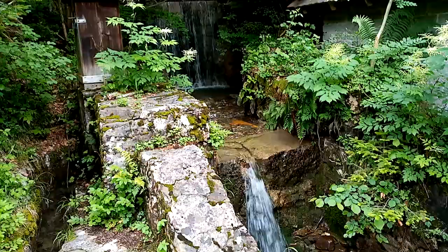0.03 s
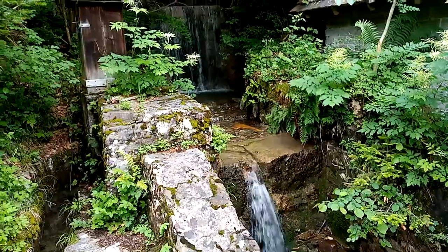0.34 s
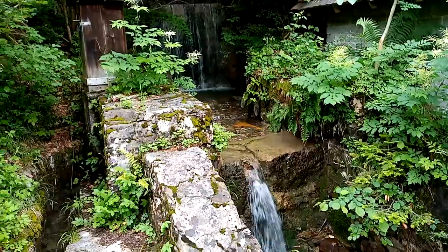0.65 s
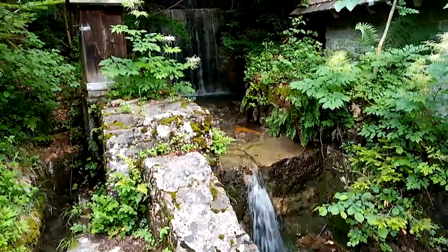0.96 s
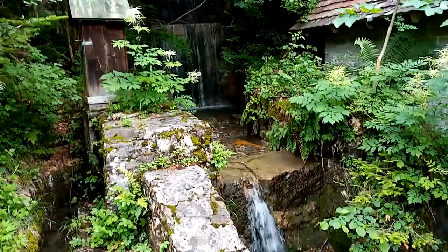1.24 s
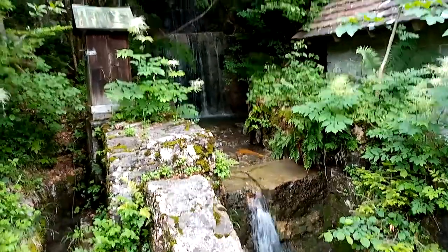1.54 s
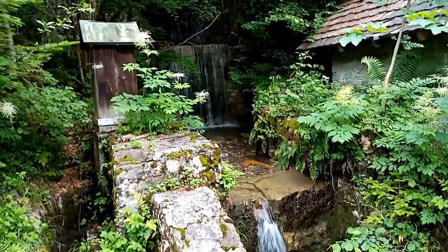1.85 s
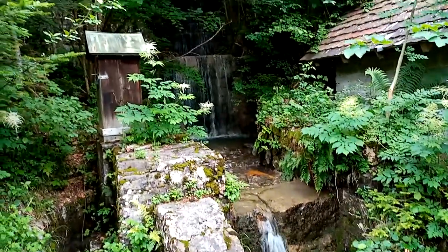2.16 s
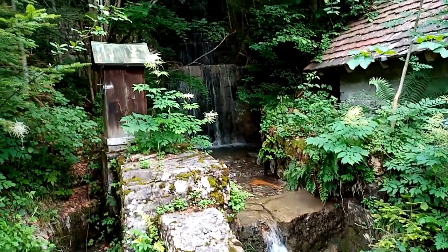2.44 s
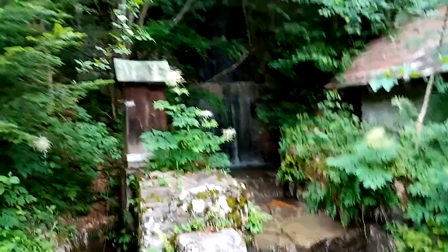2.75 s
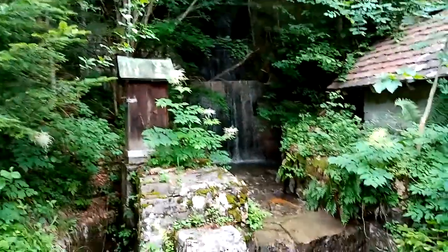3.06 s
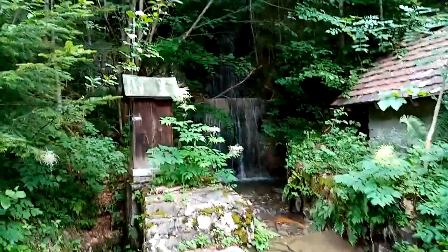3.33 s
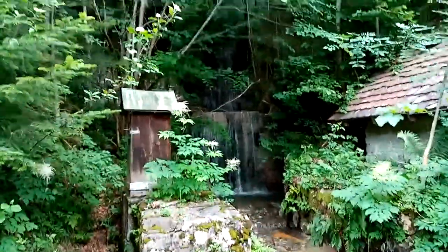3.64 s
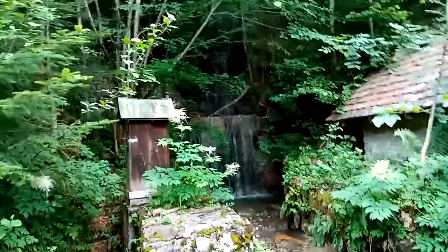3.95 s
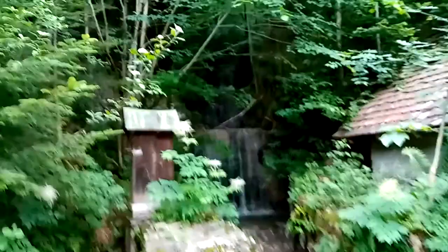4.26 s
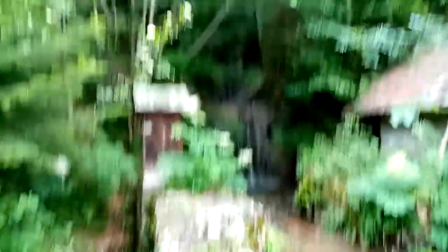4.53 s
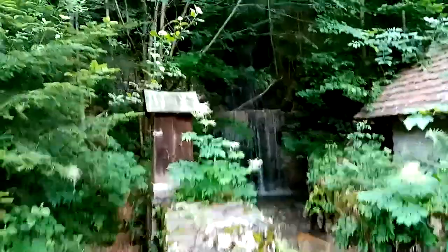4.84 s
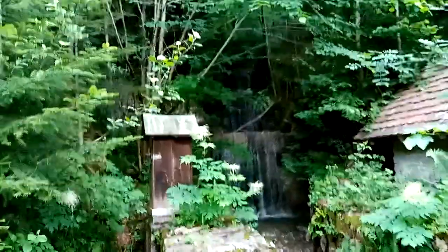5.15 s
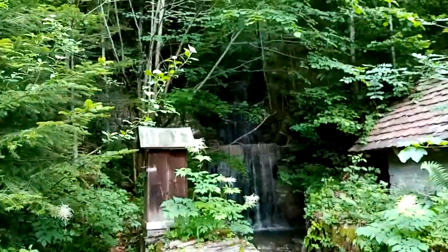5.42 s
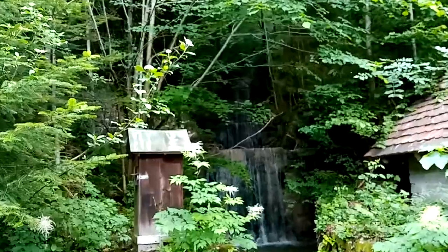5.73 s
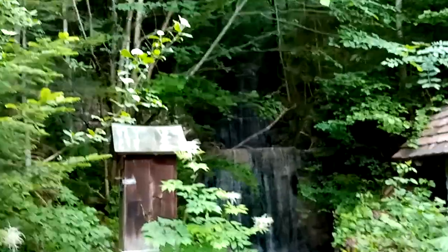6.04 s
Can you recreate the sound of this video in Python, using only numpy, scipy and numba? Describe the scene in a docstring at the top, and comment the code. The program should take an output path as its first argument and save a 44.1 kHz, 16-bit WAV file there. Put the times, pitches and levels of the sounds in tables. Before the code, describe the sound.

A small stream pours over stone steps in a wooded gully. Close by, water spatters brightly on rock, gurgles in the shallows and churns with a soft rumble in a pool. A taller waterfall farther back adds an even rush, with fine spray hissing on top. The sound fades in quickly and stays steady, with a few faint wet slaps. Heard from the bank, the near splashing sits to the right.

```python
"""Stream over stone steps

A small stream in a wooded gully, heard from the bank on a phone that tilts upward in two moves.
Close by, a jet breaks into clumps that spatter on stone and churn bubbles in the pool below.
Farther back, a taller fall fills the gully with an even wash, and fine spray hisses on top."""
import sys
import numpy as np
from scipy import signal
from scipy.fft import rfft, irfft, next_fast_len
from scipy.io import wavfile
from scipy.ndimage import map_coordinates
from numba import njit

SR = 44100
rng = np.random.default_rng(int(sys.argv[2]) if len(sys.argv) > 2 else 0)


def dump(signal):
    """Clip the signal to [-1, 1] and save it as 16-bit WAV at the path in sys.argv[1]."""
    limited = np.clip(np.atleast_2d(signal).T, -1, 1)
    pcm = np.round(limited * 32767).astype(np.int16)
    wavfile.write(sys.argv[1], SR, pcm)


N = 272979
TIME = np.arange(N) / SR
TOP_HZ = 15450  # upper limit of the phone


def undb(db):
    """Decibels to gain."""
    return 10 ** (np.asarray(db) / 20)


def unit(x):
    """Scale to rms 1."""
    return x / np.std(x)


def shape(x, points, lag_s=0):
    """Filter by (Hz, dB) points joined on a log axis, and delay by lag_s."""
    size = next_fast_len(N + SR // 10)
    hz = np.maximum(np.fft.rfftfreq(size, 1 / SR), 1)
    at_hz, db = np.transpose(points)
    gain = undb(np.interp(np.log(hz), np.log(at_hz), db))
    delay = np.exp(-2j * np.pi * hz * lag_s)
    return irfft(rfft(x, size) * gain * delay, size)[..., :N]


def colour(x, points):
    """Give a flat sound of rms 1 a spectrum in dB per Hz."""
    return shape(x, points) * np.sqrt(SR / 2)


def wander(rate):
    """A random drift with about rate turns a second and a spread of 1."""
    steps = rng.standard_normal(N // 10)
    return unit(map_coordinates(steps, [TIME * rate], order=1, mode="wrap"))


def clumps(rate, decay_s, depth):
    """Flow of mean 1 as rate lumps of water land a second: each hits at once and drains away."""
    landings = (rng.random(N) < rate / SR) * (.3 + rng.random(N))
    draining = signal.lfilter([1], [1, -np.exp(-1 / (decay_s * SR))], landings)
    flow = 1 + depth * draining / draining.mean()
    return flow / flow.mean()


@njit
def ring(start, hz, cycles, amplitude, rise):
    """Each bubble is a dying sine whose pitch rises as it nears the surface; cycles counts to -60 dB."""
    out = np.zeros(N)
    for k in range(len(start)):
        length = cycles[k] * SR / hz[k]
        step = 2 * np.pi * hz[k] / SR
        pole = np.exp(1j * step - np.log(1000) / length)
        glide = np.exp(1j * step * rise / length)
        phasor = amplitude[k] + 0j
        for i in range(start[k], min(N, start[k] + int(length))):
            out[i] += phasor.imag
            phasor *= pole
            pole *= glide
    return out


def bubbles(flow, count, low_hz, high_hz, cycles, scatter_db):
    """A cloud of bubbles born in step with the flow, most faint and a few strong."""
    when, pitch, life, strength = rng.random((count, 4)).T
    start = np.searchsorted(np.cumsum(flow) / flow.sum(), when)
    hz = low_hz * (high_hz / low_hz) ** pitch
    amplitude = hz * undb(scatter_db * strength ** 3)
    cloud = ring(start, hz, cycles * (.5 + life), amplitude, rise=0.065)
    return unit(cloud) * np.sqrt(2 * (high_hz - low_hz) / SR)  # per Hz, like white noise of rms 1


def droplets(flow, rate):
    """Tiny impacts of random size, harder when more water lands."""
    return unit((rng.random(N) < rate / SR) * rng.standard_normal(N) * np.sqrt(flow))


def near(x, left_db):
    """Close water reaches the left microphone port first, but the right picks it up more strongly."""
    return np.array([undb(left_db) * x, shape(x, [(1, 0.0039)], lag_s=0.0005477)])


def spatter():
    """Clumps shatter on the near stone step into bursts of droplets and tiny ringing bubbles."""
    # Near splash as coloured by the right microphone port's resonances.
    # Each row: frequency in Hz, relative level in dB.
    spectrum = [(1500, -103), (3200, -83.5), (3700, -73.5), (4600, -73.5), (5400, -67.5), (6550, -66.5),
                (6950, -75), (8000, -73.5), (8700, -72.5), (11000, -93), (15000, -87)]
    flow = clumps(rate=170, decay_s=.0045, depth=.85) * undb(.8 * wander(8))
    fizz = bubbles(flow, count=5000, low_hz=2815, high_hz=10000, cycles=270, scatter_db=9.0)
    splash = undb(-2.0) * droplets(flow, rate=30000) + undb(-7.0) * fizz
    return near(colour(splash, spectrum), left_db=-45)


def gurgle():
    """Middle-sized bubbles form in handfuls where the jet hits the shallows."""
    # Gurgling water as coloured by the right microphone port's resonance.
    # Each row: frequency in Hz, relative level in dB.
    spectrum = [(700, -103), (1050, -83.5), (1300, -72.5), (1750, -68.5), (2150, -70), (2500, -74),
                (2900, -96), (4000, -82.5)]
    flow = clumps(rate=140, decay_s=0.00598, depth=.55) * undb(.4 * wander(9))
    cloud = bubbles(flow, count=18000, low_hz=800, high_hz=3808, cycles=84, scatter_db=11)
    slosh = undb(-3.0) * cloud + undb(-4.5) * droplets(flow, rate=22000)
    return near(colour(slosh, spectrum), left_db=-22.0)


def plunge():
    """The jet drives air into the pool, where big short-lived bubbles rumble."""
    # Colour of the rumble. Each row: frequency in Hz, relative level in dB.
    spectrum = [(20, -118), (45, -113), (72, -100), (110, -81), (160, -83), (200, -79.5), (260, -81),
                (350, -77), (520, -82), (760, -73), (1020, -75.5), (1350, -84.5), (2200, -105)]
    flow = clumps(rate=40, decay_s=.025, depth=.55) * undb(1.5 * wander(6))
    cloud = bubbles(flow, count=13000, low_hz=44.66, high_hz=1900, cycles=19.0, scatter_db=10.5)
    churn = cloud + undb(-7.5) * rng.standard_normal(N)
    return near(colour(churn, spectrum), left_db=-2.4)


def spray():
    """The finest drops rain back on wet rock close by and hiss."""
    # Fine spray hiss as coloured by the right microphone port's resonances.
    # Each row: frequency in Hz, relative level in dB.
    spectrum = [(5000, -102), (7000, -69.5), (8000, -71.5), (8700, -67.5), (9700, -74), (11000, -81.5),
                (12500, -85.5), (13900, -79), (14700, -73), (15500, -67.5)]
    flow = clumps(rate=400, decay_s=.002, depth=.25) * undb(.7 * wander(5))
    tinkle = bubbles(flow, count=11000, low_hz=6490, high_hz=15460, cycles=480, scatter_db=12)
    hiss = undb(-3.0) * droplets(flow, rate=40000) + undb(-5.5) * tinkle
    return near(colour(hiss, spectrum), left_db=-39)


def far_fall():
    """The tall fall farther back, scattered by rock and leaves, reaches each port as a different wash."""
    # Colour of the wash from the bank. Each row: frequency in Hz, relative level in dB.
    spectrum = [(20, -111), (50, -106), (110, -91.5), (330, -90), (700, -83), (1100, -76.5), (1350, -77),
                (1650, -77), (2900, -75), (5000, -75), (6600, -73), (8000, -81), (9200, -74),
                (11000, -81.5), (15000, -92)]
    surge = undb(.8 * wander(7))
    ports = []
    for _ in range(2):
        flow = surge * clumps(rate=150, decay_s=.007, depth=.46)
        babble = bubbles(flow, count=11000, low_hz=503.0, high_hz=7967, cycles=103, scatter_db=15.0)
        ports.append(droplets(flow, rate=30000) + undb(-5.5) * babble)
    return colour(np.array(ports), spectrum)


def slaps(decay_s=0.016, edge_ratio=1.24, level_db=-7.5):
    """Big lumps of water slap the near stone, each a short burst of splash around one pitch."""
    # Lumps landing. Each row: start in seconds, relative level in dB, pitch in Hz.
    landings = [(0.468, -24, 2010), (1.8411, -29, 1900), (1.8755, -21, 5980), (2.6767, -18.5, 1600),
                (3.003, -23, 5760), (3.012, -25, 1750), (3.143, -21, 5630), (3.149, -25, 1550),
                (3.4215, -24, 6210), (4.6038, -23, 6280), (4.762, -25, 1690)]
    out = np.zeros(N)
    for start_s, db, hz in landings:
        edges_hz = [hz / edge_ratio, min(hz * edge_ratio, TOP_HZ)]
        band = signal.butter(2, edges_hz, "band", fs=SR, output="sos")
        burst = unit(signal.sosfilt(band, rng.standard_normal(N)))
        envelope = (TIME >= start_s) * np.exp(-np.abs(TIME - start_s) / decay_s)
        out += undb(db + level_db) * burst * envelope
    return near(out, left_db=-20)


def tilt_up():
    """How far the phone points up, away from the near jet, 0-1: each move eases in and out, then holds."""
    # Moves of the phone. Each row: start in seconds, length in seconds, share of the full tilt.
    moves = [(2.7, 1, 0.59), (4.2, 0.55, 0.3)]
    tilt = np.zeros(N)
    for start_s, length_s, share in moves:
        progress = np.clip((TIME - start_s) / length_s, 0, 1)
        tilt += share * np.sin(np.pi / 2 * progress) ** 2
    return tilt


def scene():
    """The steady stream, near and far, as it arrives at the two ports on the bank."""
    jet = (spatter() + gurgle()) * undb(0.63)
    return jet + slaps() + plunge() + spray() * undb(-0.27) + far_fall()


def record(dry):
    """The phone dulls its left port, changes colour on the right as it tilts, fades in and cuts the top."""
    # The left port, shy in the middle and muffled at the top. Each row: frequency in Hz, gain in dB.
    left_port = [(400, 0.5), (750, -2), (1400, -1.5), (9300, -1.5), (10500, -16), (12000, -16),
                 (13800, -23), (14800, -5), (15500, -17)]
    # The right port at full tilt. Each row: frequency in Hz, gain in dB.
    tilted_port = [(1500, 0.5), (1850, 0.6), (2180, -8), (2650, 0), (3200, -2.5), (3750, -2), (5500, -3.5),
                   (6600, -2.5), (8800, 0.4), (13000, 1), (15000, 0.8)]
    left, right = dry
    tilt = tilt_up()
    ports = np.array([shape(left, left_port), (1 - tilt) * right + tilt * shape(right, tilted_port)])
    ramp = np.interp(TIME, [0.096, 0.39], [0, 1])
    fade = (TIME >= 0.12) * ramp ** 1.14  # opens a little way up the ramp
    low_pass = signal.ellip(12, .1, 80, TOP_HZ, fs=SR, output="sos")
    return signal.sosfilt(low_pass, ports * fade)


dry = scene()
out = record(dry)
dump(out)
```